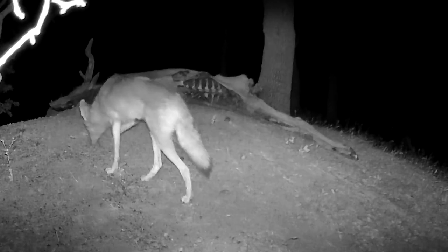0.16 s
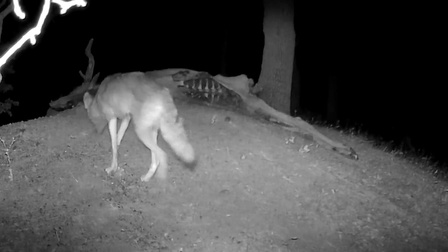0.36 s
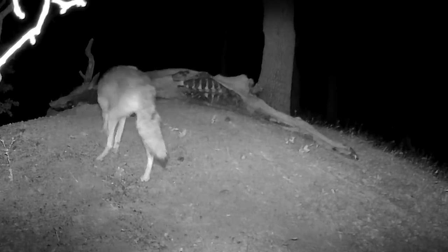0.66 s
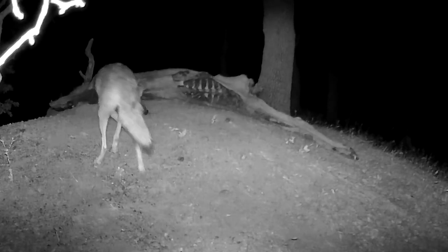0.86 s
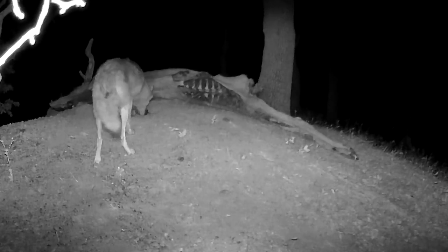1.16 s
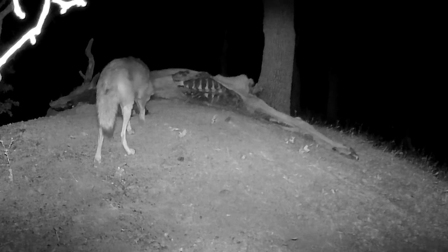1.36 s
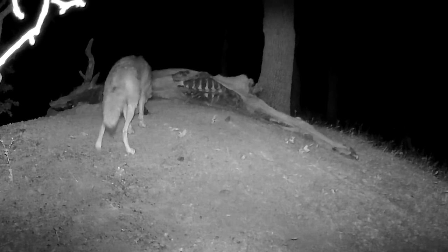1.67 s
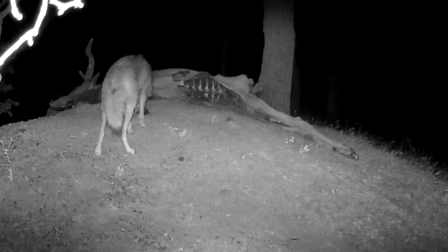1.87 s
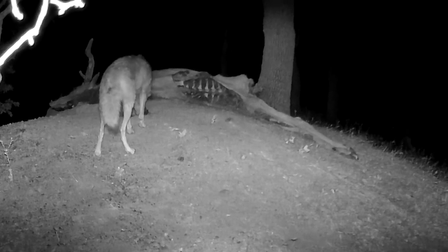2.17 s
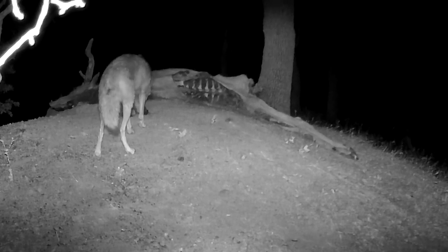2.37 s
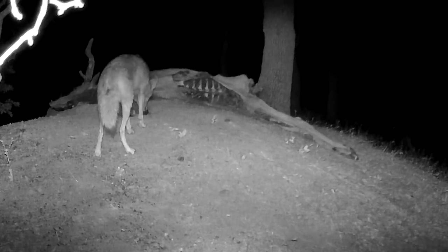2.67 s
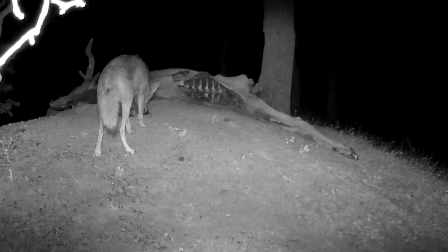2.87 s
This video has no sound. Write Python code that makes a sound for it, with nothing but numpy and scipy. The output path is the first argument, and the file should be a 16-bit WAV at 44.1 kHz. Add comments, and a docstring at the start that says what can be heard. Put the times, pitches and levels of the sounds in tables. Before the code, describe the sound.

A cricket close by, toward the left, chirps throughout, about three times a second, each chirp three quick, clear, high tones with slight woodland scatter. Behind it run a steady, very high fluttering katydid buzz and faint far crickets. Quiet night air and a faint distant engine hum lie below, with deep soft rumble swelling near 0.3, 1.8 and 2.5 seconds. Tiny dry ticks fall around 1.8 and 2.4.

```python
"""Wood at night. A near field cricket chirps in threes: gliding tones, one per wing stroke, plus tree scatter.
Far crickets are heard as scatter only. Katydids, mostly near 9 kHz, are resonance-shaped noise gated at
each one's own stroke rate, over a chorus of coloured noise. Beneath: an engine hum of wavering harmonics,
noise for night air, a swelling rumble of wavering 15 Hz sine and low noise. Two tiny ticks are noise bursts."""
import sys
import numpy as np
from scipy import signal
from scipy.fft import rfft, irfft, next_fast_len
from scipy.io import wavfile
from scipy.ndimage import map_coordinates

SR = 44100
rng = np.random.default_rng(int(sys.argv[2]) if len(sys.argv) > 2 else 0)


def wrap_up_sound(samples):
    """Save the sound to the file named by the first command line argument, as 16-bit audio."""
    columns = np.atleast_2d(samples).T
    # keep every value between -1 and 1, then stretch to whole-number steps
    tamed = np.clip(columns, -1, 1)
    steps = np.round(tamed * 32767).astype(np.int16)
    wavfile.write(sys.argv[1], SR, steps)


N = 132300

# Night air and hiss spectrum, relative: f/Hz, density/dB per Hz
AIR_SPECTRUM = [(20, -7), (60, 4), (130, 0.5), (250, -2), (400, -2), (600, -6.5), (950, -8.5),
                (1400, -12.5), (2000, -16), (3500, -18), (6500, -21.5), (9800, -36.5), (12000, -28),
                (15500, -28)]
# Night air left-right likeness: f/Hz, correlation
AIR_LIKENESS = [(60, 0), (160, 0.46), (450, 0.54), (800, 0.47), (1300, 0.45), (2000, 0.078), (3300, 0),
                (15000, 0)]
# Subsonic noise spectrum, relative: f/Hz, density/dB per Hz
DEEP_SPECTRUM = [(4, -25), (11, -9), (15, 4.5), (24, -9.5), (35, -15), (55, -44), (100, -69), (200, -120)]
# Bass noise spectrum, relative: f/Hz, density/dB per Hz
BASS_SPECTRUM = [(25, -24), (45, -4.5), (65, 6), (100, -15), (160, -27), (400, -96)]
# Subsonic rumble swell, before layer gains: t/s, level/dB
DEEP_SWELL = [(0.0, -68), (0.05, -53.5), (0.11, -67), (0.22, -37), (0.32, -32.5), (0.57, -46), (0.99, -50),
              (1.04, -43), (1.31, -38.5), (1.4, -51), (1.64, -48), (1.76, -32.5), (2.05, -35.5),
              (2.17, -50.5), (2.29, -39), (2.37, -58), (2.46, -38), (3.0, -51)]
# Bass swell, before layer gain: t/s, level/dB
BASS_SWELL = [(0, -72), (.15, -68), (.3, -62), (.45, -74), (.6, -72), (.85, -67), (.97, -57), (1.1, -64.5),
              (1.4, -69.5), (1.7, -63.5), (1.97, -58), (2.15, -67.5), (2.3, -67), (2.38, -56.5),
              (2.5, -68.5), (3, -63)]
# Engine harmonics, before swell: multiple of HUM_HZ, level/dB
HUM_HARMONICS = [(2, -73), (3, -78.5), (4, -72), (6, -74.5), (7, -81.5), (8, -85.5), (10, -83.5)]
# Engine swell, relative: t/s, level/dB
HUM_SWELL = [(0, -14), (.25, -5), (.4, -1), (.8, -1.5), (1.1, 3.5), (1.55, -1.5), (1.9, 3), (2.4, 1),
             (3, 0.5)]
# Katydids, before layer gain: stroke rate/Hz, time of one stroke/s, centre f/Hz, width/Hz, level/dB
KATYDID_VOICES = [(20.06, .0009, 8150, 380, -66), (20.48, .0056, 8650, 260, -66.5),
                  (22.34, .0105, 9050, 230, -66), (19.42, .0347, 9350, 100, -70.5),
                  (21.45, .04, 8850, 250, -70)]
# Far insect chorus spectrum, relative: f/Hz, density/dB per Hz
CHORUS_SPECTRUM = [(4000, -36), (4450, -11.5), (4770, -0.5), (5000, -8), (5300, -3), (5550, -6),
                   (5750, -25), (6300, -60), (7000, -15), (7600, -13.5), (8400, 3.5), (9000, 5.5),
                   (9400, -8), (9750, -44), (10500, -21), (11500, -51)]
# Far crickets: pitch/Hz, chirp rate/Hz, level/dB
FAR_CRICKET_VOICES = [(4705, 3.1, -78), (4800, 2.29, -76), (5140, 3.3, -77), (5450, 3.7, -75.5)]
# Near cricket chirps: start t/s, relative level/dB
CHIRP_TIMES = [(-.056, -1.3), (.2115, -1.3), (.5835, 0), (.871, 0), (1.1495, 0), (1.5685, -.3), (1.917, -1),
               (2.2365, -.2), (2.5575, .2), (2.978, 1.2)]
# Wing strokes of a chirp, last row the flick as the wings part:
# delay/s, length/s, pitch/Hz, glide over stroke/Hz, stall at end/Hz, level before chirp level/dB
WING_STROKES = [(-.0015, .0192, 5460, 70, 300, -36.5), (.0312, .0222, 5540, 280, 460, -33.5),
                (.069, .0218, 5585, 400, 520, -31.8), (.0898, .007, 5130, -450, 100, -46)]
# Ticks: t/s, level before colour/dB
TICK_TIMES = [(1.756, -47.5), (2.4324, -47.5)]
# Tick spectrum, relative: f/Hz, density/dB
TICK_SPECTRUM = [(1000, -20), (3400, -31), (4400, 0), (6000, -8), (7500, 0.5), (9800, -10), (11500, -20),
                 (15500, -25)]
# Rebound spectrum, relative: f/Hz, density/dB
REBOUND_SPECTRUM = [(1000, -18), (9000, -2), (11500, -2), (14500, -14)]

AIR_DB, AIR_PAN_DB = -61, -.55
SWAY_HZ, SWAY_WAVER, SWAY_SPREAD_RAD = 15, .077, .47  # waver: fraction of pitch; spread: phase drift per channel
SWAY_DB, DEEP_DB, BASS_DB, RUMBLE_PAN_DB = .5, -9, -.5, -1.5
HUM_HZ, HUM_WAVER, HUM_PAN_DB = 97.64, .01495, -1.5
HUM_FADE, HUM_FADE_KNOTS_HZ, HUM_ROUGH, HUM_ROUGH_KNOTS_HZ = .4, 9, .42, 32
TRILL_DUTY, TRILL_EDGE, TRILL_FLOOR = .35, 3.9, .35  # floor: gain added under the strokes
KATYDID_DB, TRILL_PAN_DB, TRILL_LIKENESS = -.5, 3, -.35
CHORUS_DB, CHORUS_LIKENESS = -59.5, -.11
FAR_STROKE_HZ, FAR_T60_S = 28, .52
FAR_GLIDE_HZ, FAR_WAVER_HZ = 162, 35.7  # fall over a stroke; unsteadiness
STROKE_PEAK, STALL_SHARE = .69, .17  # fractions of a stroke
PITCH_VARY_HZ, BEND_VARY_HZ = 8.2, 30
CATCH_HZ, CATCH_SHARE = 129, .12  # a stroke starts sharp as the scraper catches the file
TOOTH_HZ, TOOTH_DB = 24, .45  # unevenness of the file
OVERTONE_DB, OVERTONE_KNOTS_HZ = -41, 700
RIGHT_DB, RIGHT_LAG_RAD = -5.5, 2.42
BOUNCE_S, BOUNCE_DB, BOUNCE_HZ = .0034, -15, 5530  # bounce in phase at BOUNCE_HZ
WOOD_T60_S, WOOD_DB, DEEP_WOOD_T60_S, DEEP_WOOD_DB = .1, -21.5, .54, -23
WOOD_GAP_S = .008  # the first scatter arrives this late
TICK_RISE_S, TICK_T60_S, REBOUND_S, REBOUND_DB = .0007, .014, .0062, -13
TOP_HZ = 15750


def amp(db):
    """Decibels to gain."""
    return 10 ** (np.asarray(db) / 20)


def unit(x):
    """Scaled to rms 1 over all channels."""
    return x / np.sqrt(np.mean(x ** 2) + 1e-20)


def along(points, hz):
    """(f/Hz, value) points interpolated on a log frequency axis."""
    f, v = np.transpose(points)
    return np.interp(np.log(hz + 1), np.log(f + 1), v)


def clock():
    """Time of every sample, s."""
    return np.arange(N) / SR


def swell(points):
    """(t/s, level/dB) points as a gain curve."""
    return amp(np.interp(clock(), *np.transpose(points)))


def wobble(knots_hz):
    """Smooth random curve through normal knots."""
    knots = rng.standard_normal(int(N * knots_hz / SR) + 4)
    return map_coordinates(knots, [clock() * knots_hz])


def turning(pitch_hz):
    """Phase in radians: the running integral of pitch."""
    return 2 * np.pi * np.cumsum(pitch_hz) / SR


def filtered(x, response):
    """x through a complex frequency response."""
    m = next_fast_len(N + SR // 2)
    spectrum = rfft(x, m) * response(np.fft.rfftfreq(m, 1 / SR))
    return irfft(spectrum, m)[..., :N]


def pan(db):
    """Gains putting left db above right."""
    return amp(np.array([[db], [-db]]) / 2)


def noise(gain, likeness):
    """Stereo noise of rms 1; gain and left-right correlation are functions of frequency."""
    def mid_side_gain(hz):
        angle = np.arccos(np.clip(likeness(hz) + 0 * hz, -1, 1)) / 2
        return gain(hz) * np.array([np.cos(angle), np.sin(angle)])

    mid, side = filtered(rng.standard_normal((2, N)), mid_side_gain)
    return unit(np.array([mid + side, mid - side]))


def coloured(spectrum, likeness):
    """Stereo noise with a table's spectrum and one left-right correlation."""
    return noise(lambda hz: amp(along(spectrum, hz)), lambda hz: likeness)


def trees(x, t60_s):
    """Diffuse scatter: mono x through separate decaying noise tails per channel, at the rms of x."""
    t = np.arange(SR) / SR
    tail = rng.standard_normal((2, SR)) * amp(-60 * t / t60_s) * (t > WOOD_GAP_S)
    scatter = signal.fftconvolve(x[None], tail, axes=1)[:, :N]
    return unit(scatter) * np.sqrt(np.mean(x ** 2))


def night_air():
    """Steady broadband noise whose left-right likeness varies with frequency."""
    hush = noise(lambda hz: amp(along(AIR_SPECTRUM, hz)), lambda hz: along(AIR_LIKENESS, hz))
    return amp(AIR_DB) * pan(AIR_PAN_DB) * hush


def deep_rumble():
    """Mostly subsonic: one wavering sine plus low noise, swelling and sinking; bass swells separately."""
    phase = turning(SWAY_HZ * (1 + SWAY_WAVER * wobble(10)))
    drift = SWAY_SPREAD_RAD * np.array([wobble(5), wobble(4.96)])
    sway = unit(np.sin(phase + drift))
    deep = swell(DEEP_SWELL) * (amp(SWAY_DB) * sway + amp(DEEP_DB) * coloured(DEEP_SPECTRUM, 0))
    bass = amp(BASS_DB) * swell(BASS_SWELL) * coloured(BASS_SPECTRUM, .33)
    return pan(RUMBLE_PAN_DB) * (deep + bass)


def far_engine():
    """Faint drone: harmonics share one pitch drift, each fades on its own."""
    def fading():
        return HUM_ROUGH * (wobble(HUM_ROUGH_KNOTS_HZ) + 1j * wobble(HUM_ROUGH_KNOTS_HZ))

    phase = turning(HUM_HZ * (1 + HUM_WAVER * wobble(4)))
    out = np.zeros((2, N))
    for order, db in HUM_HARMONICS:
        shared = 1 + HUM_FADE * wobble(HUM_FADE_KNOTS_HZ) + fading()
        envelopes = np.array([shared + fading(), shared + fading()])
        out += amp(db) * unit(np.real(envelopes * np.exp(1j * order * phase)))
    return out * pan(HUM_PAN_DB) * swell(HUM_SWELL)


def katydids():
    """Each rasps its wing resonance, noise in a narrow band, in even strokes at its own rate."""
    t, out = clock(), np.zeros((2, N))
    for rate_hz, when_s, centre_hz, width_hz, db in KATYDID_VOICES:
        swing = np.cos(2 * np.pi * rate_hz * (t - when_s)) - np.cos(np.pi * TRILL_DUTY)
        strokes = TRILL_FLOOR + (1 + np.tanh(TRILL_EDGE * swing)) / 2
        rasp = noise(lambda hz: (1 + ((hz - centre_hz) / width_hz / 2) ** 2) ** -2,
                     lambda hz: TRILL_LIKENESS)
        out += amp(KATYDID_DB + db) * unit(strokes * rasp)
    return out * pan(TRILL_PAN_DB)


def insect_chorus():
    """Many far insects merged into steady coloured noise."""
    return amp(CHORUS_DB) * coloured(CHORUS_SPECTRUM, CHORUS_LIKENESS)


def far_crickets():
    """Distant chirps of falling-pitch wing strokes, heard only as scatter from the trees."""
    t, out = clock(), np.zeros((2, N))
    for hz, rate_hz, db in FAR_CRICKET_VOICES:
        stroke = (FAR_STROKE_HZ * t + .3 * wobble(4.9)) % 1
        cycles = rate_hz * t + rng.random() + .074 * wobble(2.9)
        chirp = np.maximum(np.sin(2 * np.pi * cycles), 0)
        pitch_hz = hz - FAR_GLIDE_HZ * (stroke - .5) + FAR_WAVER_HZ * wobble(60)
        song = chirp * np.sin(np.pi * stroke) ** 2 * np.sin(turning(pitch_hz))
        out += amp(db) * trees(unit(song), FAR_T60_S)
    return out


def near_cricket():
    """Each wing stroke swells as a pure tone and drops in pitch as the wing stalls; faint overtone flickers."""
    t, level = clock(), np.zeros(N)
    pitch_hz = np.full(N, WING_STROKES[0][2], float)
    for start_s, chirp_db in CHIRP_TIMES:
        for delay_s, length_s, hz, glide_hz, stall_hz, db in WING_STROKES:
            u = (t - start_s - delay_s) / length_s
            on = (u > 0) & (u < 1)
            u = u[on]
            bow = np.sin(np.pi * np.interp(u, [0, STROKE_PEAK, 1], [0, .5, 1]))
            level[on] = amp(chirp_db + db) * np.abs(bow)
            base = hz + rng.normal(0, PITCH_VARY_HZ)
            glide = rng.normal(glide_hz, BEND_VARY_HZ) * (u - .5)
            catch = CATCH_HZ * np.exp(-u / CATCH_SHARE)
            stall = stall_hz * np.exp((u - 1) / STALL_SHARE)
            pitch_hz[on] = base + glide + catch - stall
    phase = turning(pitch_hz + TOOTH_HZ * wobble(1100))
    overtone = wobble(OVERTONE_KNOTS_HZ) * np.sin(2 * phase) + wobble(OVERTONE_KNOTS_HZ) * np.cos(2 * phase)
    song = level * amp(TOOTH_DB * wobble(1300)) * (np.sin(phase) + amp(OVERTONE_DB) * overtone)

    def right_response(hz):
        bounce = 1 + amp(BOUNCE_DB) * np.exp(-2j * np.pi * (hz - BOUNCE_HZ) * BOUNCE_S)
        return amp(RIGHT_DB) * np.exp(-1j * RIGHT_LAG_RAD) * bounce

    direct = np.array([song, filtered(song, right_response)])
    short_scatter = amp(WOOD_DB) * trees(song, WOOD_T60_S)
    long_scatter = amp(DEEP_WOOD_DB) * trees(song, DEEP_WOOD_T60_S)
    return direct + short_scatter + long_scatter


def ticks():
    """Tiny dry clicks: fast-decaying noise, each with a fainter, brighter rebound."""
    def burst(delay_s):
        total = np.zeros(N)
        for start_s, db in TICK_TIMES:
            t = clock() - start_s - delay_s
            decay = amp(-60 * np.maximum(t - TICK_RISE_S, 0) / TICK_T60_S)
            total += amp(db) * np.clip(t / TICK_RISE_S, 0, 1) * decay
        return total

    rebound = burst(REBOUND_S) * coloured(REBOUND_SPECTRUM, 0)
    return burst(0) * coloured(TICK_SPECTRUM, 0) + amp(REBOUND_DB) * rebound


def scene():
    """Sum of all sources, left and right."""
    beds = night_air() + deep_rumble() + far_engine()
    insects = katydids() + insect_chorus() + far_crickets() + near_cricket()
    return beds + insects + ticks()


def record(dry):
    """Band limit: nothing kept from TOP_HZ up."""
    return filtered(dry, lambda hz: hz < TOP_HZ)


dry = scene()
out = record(dry)
wrap_up_sound(out)
```